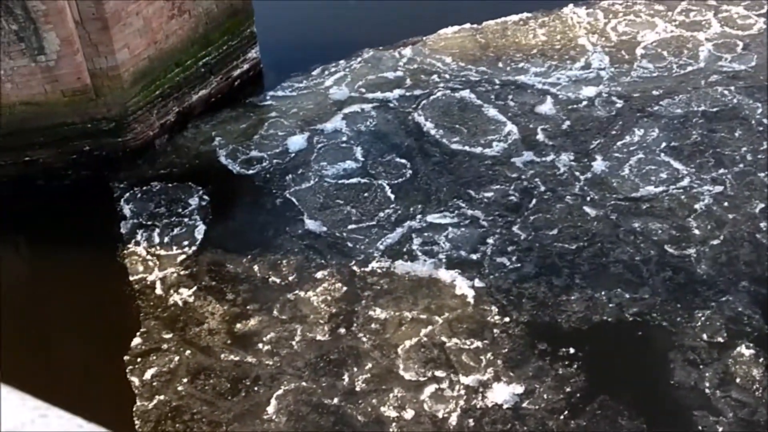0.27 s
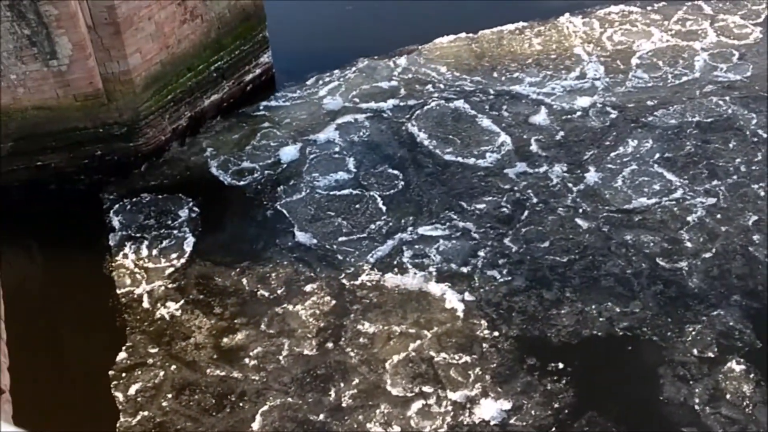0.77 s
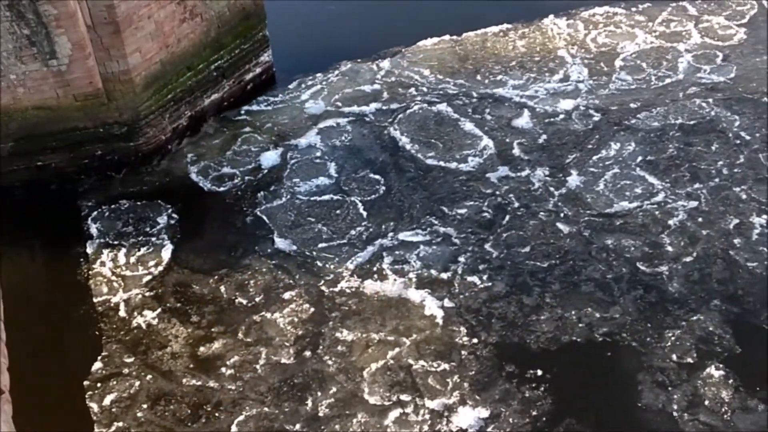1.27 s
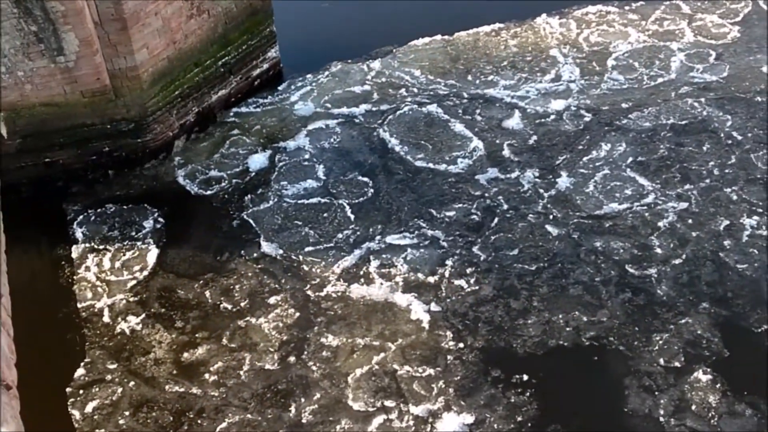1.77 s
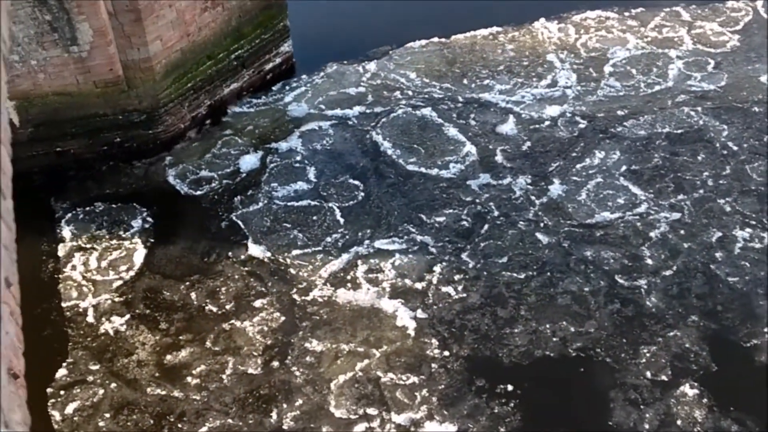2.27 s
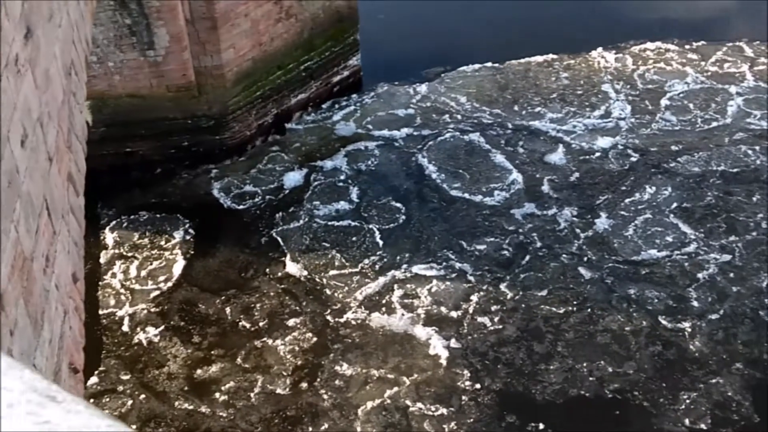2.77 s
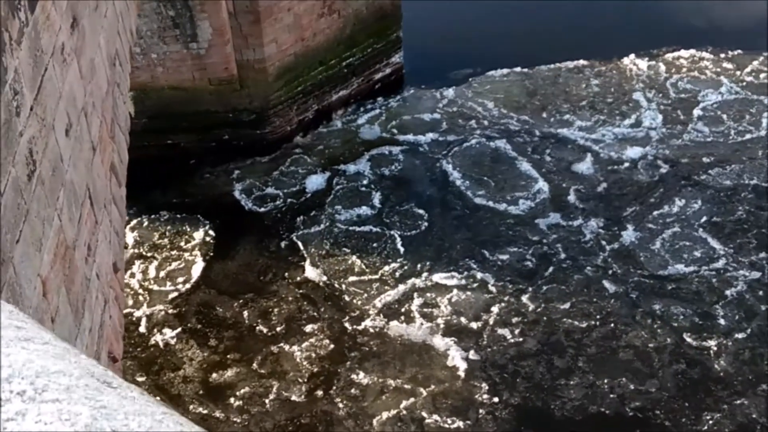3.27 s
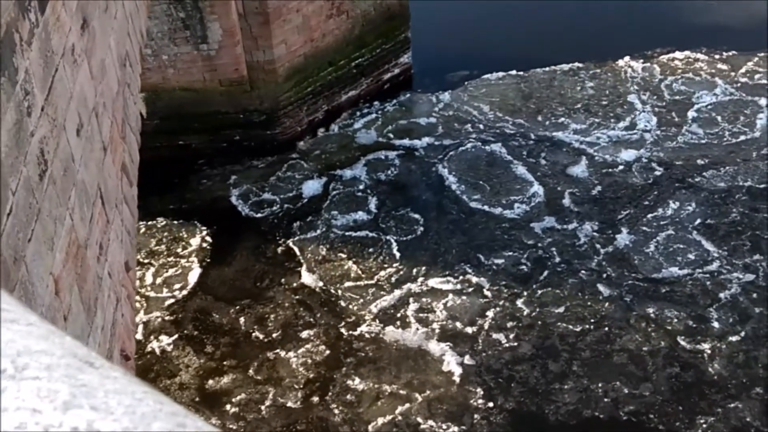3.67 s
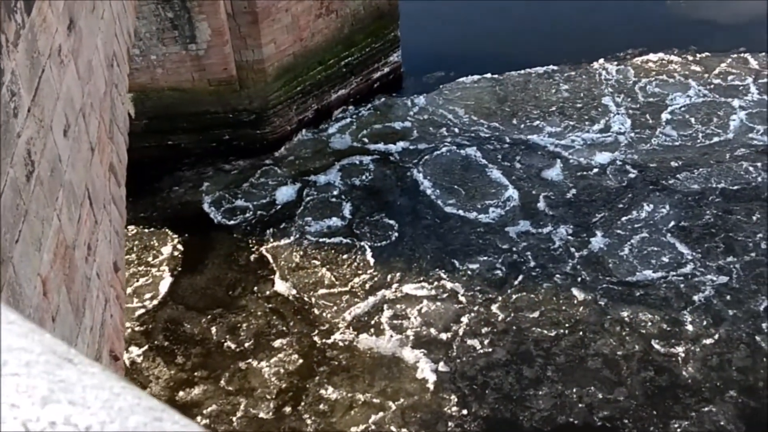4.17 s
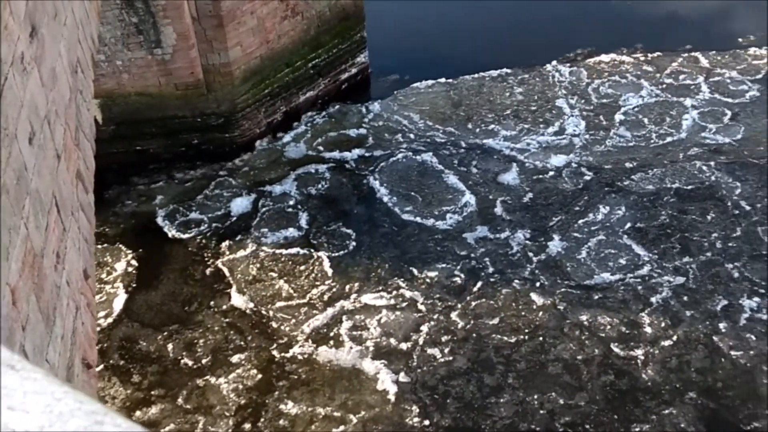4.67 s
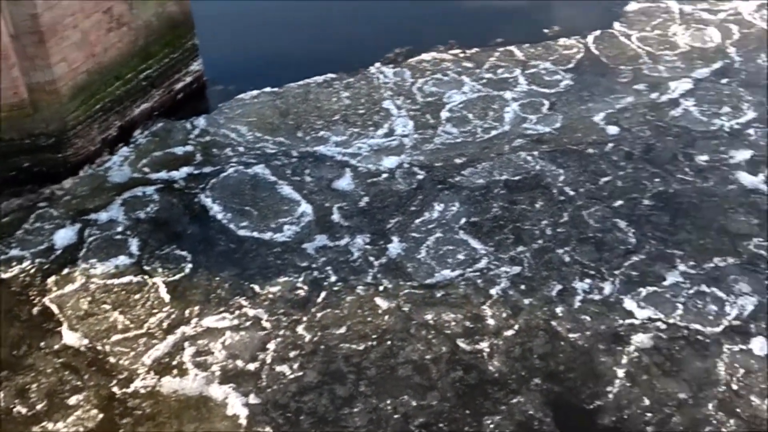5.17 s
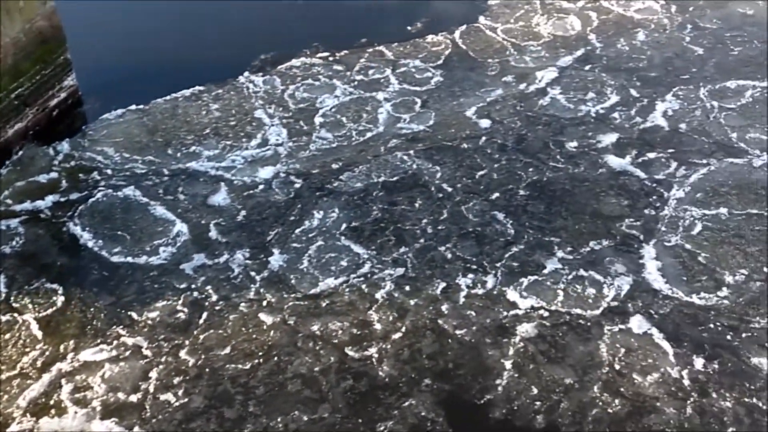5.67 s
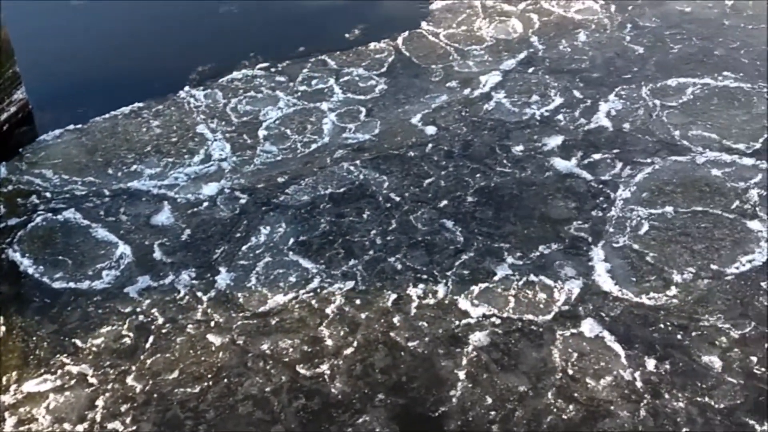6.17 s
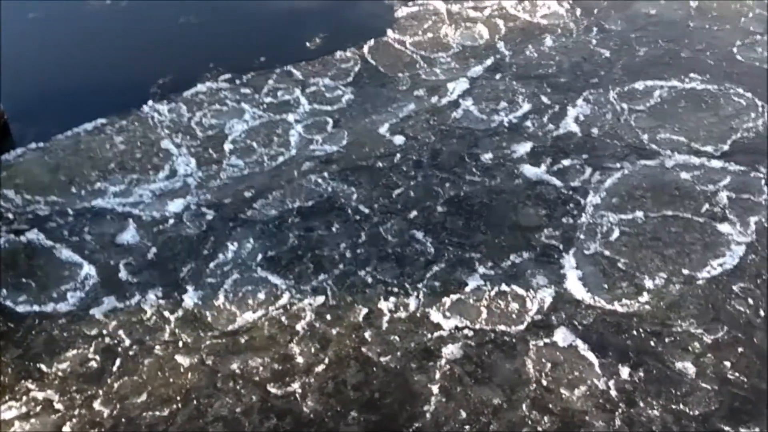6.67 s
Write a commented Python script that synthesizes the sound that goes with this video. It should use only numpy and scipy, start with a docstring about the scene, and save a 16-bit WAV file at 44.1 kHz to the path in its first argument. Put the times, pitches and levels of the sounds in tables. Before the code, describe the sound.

Heard from a bridge above a river, drifting ice floes rub and bump beside a brick pier. Low water churns and gulps. Hollow knocks come early, then a grainy slush rush swells around two seconds and ebbs. A busy run of knocks fills the middle; later it is quieter, with small clinks and a sharp clack near the end. Nearly centred stereo, slightly dulled top.

```python
"""Ice floes at a bridge pier

Ice floes drift down a river past a brick pier, heard from the bridge above.
Water is coloured noise and dull thuds; floes bump with short hollow knocks that sag in pitch.
Slushy rims rub with a rush of dense grains that swells once, and briefly sing in narrow bands.
Thin ice crunches and fizzes in finer grains, clinks in short resonances, and now and then
cracks in decaying clusters of snaps.
"""
import sys
import numpy as np
from scipy import signal
from scipy.fft import rfft, irfft, next_fast_len
from scipy.io import wavfile

SR = 44100
rng = np.random.default_rng(int(sys.argv[2]) if len(sys.argv) > 2 else 0)


def unload_wav(signal):
    """Save mono or channel-first audio to the path in sys.argv[1] as 16-bit WAV at rate SR, clipped to [-1, 1]."""
    wavfile.write(
        sys.argv[1],
        SR,
        np.round(np.clip(np.atleast_2d(signal).T, -1, 1) * 32767).astype(np.int16),
    )


N = 305613
TIME = np.arange(N) / SR


def from_db(db):
    """Decibels to gain."""
    return 10 ** (np.asarray(db) / 20)


def rms_one(x):
    """Scale to unit power."""
    return x / np.sqrt(np.mean(x ** 2) + 1e-20)


def white():
    """White noise of unit power."""
    return rng.standard_normal(N)


def gains(rows):
    """One interpolated gain curve per dB column of a table."""
    time_s, *columns_db = np.transpose(rows)
    return [from_db(np.interp(TIME, time_s, db)) for db in columns_db]


def swell(peak_s, half_s):
    """Smooth rise and fall around one moment."""
    return np.exp(-np.minimum(((TIME - peak_s) / half_s) ** 2, 50))


def drift(rate_hz):
    """Slow random wander with a spread of one, computed at every 40th sample."""
    pole = np.exp(-80 * np.pi * rate_hz / SR)
    slow = signal.lfilter([1], [1, -2 * pole, pole * pole], rng.standard_normal(N // 40 + 2002))
    slow = slow[2000:]  # skip the filter's start-up
    return np.interp(np.arange(N) / 40, np.arange(len(slow)), rms_one(slow))


def surge(rate_hz, depth_db):
    """Stick and slip make the level stumble; unit power."""
    return rms_one(from_db(depth_db * drift(rate_hz)))


def colour(x, spectrum):
    """Give a white signal a spectrum, keeping its power."""
    size = next_fast_len(N + SR // 10)
    hz, db = np.transpose(spectrum)
    bins_hz = np.maximum(np.fft.rfftfreq(size, 1 / SR), 1)
    gain = from_db(np.interp(np.log(bins_hz), np.log(hz), db))
    gain *= np.minimum(1, bins_hz / hz[0]) ** 2 * np.minimum(1, hz[-1] / bins_hz) ** 4
    return irfft(rfft(x, size) * rms_one(gain), size)[..., :N]


def grains(per_s, spread_db, smooth):
    """Random tiny contacts of uneven size over a smooth share of countless far ones; unit power."""
    size_db = spread_db * np.minimum(rng.exponential(1, N), 4)
    sizes = from_db(size_db) * rng.choice([-1, 1], N)
    clicks = sizes * (rng.random(N) < per_s / SR)
    return rms_one(rms_one(clicks) + smooth * white())


def widen(mid, side_db):
    """Diffuse sound reaches the two microphones differently: noise of opposite sign is added."""
    return mid + from_db(side_db) * white() * np.array([[1], [-1]])


def waver(x, edges_hz, rate_hz, depth_db):
    """Overlapping bands swell and fade, each on its own."""
    size = next_fast_len(N)
    spectrum, hz = rfft(x, size), np.fft.rfftfreq(size, 1 / SR)
    out = 0
    for share in np.eye(len(edges_hz)):
        band = irfft(spectrum * np.interp(hz, edges_hz, share), size)[..., :N]
        out = out + band * surge(rate_hz, depth_db)
    return out


def bursts(rows, decay_s):
    """Envelope that jumps at each event and dies away exponentially."""
    jumps = np.zeros(N)
    for time_s, db in rows:
        jumps[int(time_s * SR)] += from_db(db)
    return signal.lfilter([1], [1, -np.exp(-1 / (decay_s * SR))], jumps + 1e-18)


def bandpass(x, low_hz, high_hz):
    """Second-order resonance between two edges."""
    return signal.sosfilt(signal.butter(2, [low_hz, high_hz], "band", fs=SR, output="sos"), x)


# water gulps under a rocking floe: (time [s], relative level [dB])
GULPS = [(.02, -38), (.2, -31.5), (.37, -29), (.45, -30.5), (.71, -37), (.98, -33), (1.12, -34),
         (1.25, -31), (2.49, -32), (2.73, -33), (2.83, -37), (3.9, -34.5), (4.71, -30), (5.09, -34.5),
         (5.2, -38), (5.6, -38), (5.81, -31), (6.12, -33), (6.27, -36), (6.38, -35), (6.51, -34.5)]
GULP_HALF_S = 0.03


def gulping():
    """Gulp envelope: overlapping swells add in power."""
    return sum(from_db(db) ** 2 * swell(s, GULP_HALF_S) for s, db in GULPS) ** .5


def jostling():
    """Envelope of the stir around each bump in KNOCKS; swells add in power."""
    return sum(from_db(db) ** 2 * swell(s, half_s) for s, db, _, half_s in KNOCKS) ** .5


# current: (time [s], relative deep rumble level [dB], relative churning level [dB])
CURRENT = [(0.01, -41, -27.5), (0.67, -42, -36), (1.05, -36, -30), (1.53, -49, -28.5), (1.97, -55, -29.5),
           (2.37, -46, -25), (2.61, -53, -27.5), (2.89, -42, -26.5), (3.13, -52.5, -34.5),
           (3.81, -44.5, -29), (5.07, -43.5, -33.5), (5.27, -43.5, -25), (5.49, -45, -42),
           (5.87, -47, -36.5), (6.41, -38, -28), (6.91, -42, -39)]
# spectra of rumble, thuds and gulp belly: (frequency [Hz], relative density [dB])
RUMBLE_COLOUR = [(20, -30), (40, -25), (60, -17), (85, -3.5), (115, 0.5), (160, -1), (260, -2)]
CHURN_COLOUR = [(80, -24.5), (130, -11.5), (200, -2), (310, 3), (420, 1.5), (550, -9), (700, -14),
                (1000, -77)]
GULP_COLOUR = [(90, -11), (140, 1), (230, -4), (330, -1), (500, -24)]
# relative to the gulp or bump envelope
GULP_BELLY_DB, GULP_CHURN_DB = -4.5, -0.5
JOSTLE_CHURN_DB, JOSTLE_RUMBLE_DB = -15.5, -35.5


def river():
    """Water rumbles and churns in many small dull thuds; gulps and jostling floes stir up both."""
    gulp, jostle = gulping(), jostling()
    undertow, flow = gains(CURRENT)
    undertow = undertow * from_db(4.5) * surge(rate_hz=12, depth_db=-1.0)
    flow = flow * from_db(0.5) * surge(rate_hz=7.4, depth_db=1.5)
    # independent stirrings add in power
    rumble_gain = np.linalg.norm([undertow, gulp, jostle * from_db(JOSTLE_RUMBLE_DB)], axis=0)
    churn_gain = np.linalg.norm(
        [flow, gulp * from_db(GULP_CHURN_DB), jostle * from_db(JOSTLE_CHURN_DB)], axis=0)
    rumble = colour(widen(white(), side_db=-11.5), RUMBLE_COLOUR)
    belly = colour(white(), GULP_COLOUR) * from_db(GULP_BELLY_DB)
    thuds = colour(grains(per_s=250, spread_db=1.6, smooth=0.64), CHURN_COLOUR)
    thuds = waver(thuds, np.geomspace(140, 650, num=6), rate_hz=10.4, depth_db=3.5)
    return rumble * rumble_gain + belly * gulp + thuds * churn_gain


# floes shove: (time of release [s], gain [dB])
SHOVES = [(.165, 2.5), (.87, 6.5), (1.24, 4.5), (2.48, 3.5), (3.015, 5), (5.285, 1.5), (6.5, 2.5)]
SHOVE_BUILD_S, SHOVE_RELEASE_S = 0.065, 0.0081  # time constants


def shoving_db():
    """Shoves as gain in dB: pressure builds slowly in the slush, then lets go quickly."""
    total_db = 0
    for release_s, db in SHOVES:
        constant_s = np.where(TIME < release_s, SHOVE_BUILD_S, SHOVE_RELEASE_S)
        total_db = total_db + db * np.exp(-np.abs(TIME - release_s) / constant_s)
    return total_db


# rush turns hollow: (mid time [s], half length [s], frequency [Hz], width [Hz], mean depth [0-1])
HOLLOWS = [(0.376, 0.2, 1340, 266, 1), (0.594, 0.7, 816, 242, 0.74), (3.8, 0.88, 806, 127, 0.51),
           (5.48, 0.59, 926, 170, 0.4), (6.74, 0.043, 1290, 300, 0.3)]
HOLLOW_WOBBLE = 0.19  # spread of the depth, as a share of it


def hollow(x):
    """Soft notches open, waver and close again; each is applied twice."""
    for mid_s, half_s, hz, width_hz, depth in HOLLOWS:
        wobbly_depth = np.clip(depth * (1 + HOLLOW_WOBBLE * drift(5.6)), 0, 1)
        opening = wobbly_depth / (1 + ((TIME - mid_s) / half_s) ** 4) ** 2
        peak = signal.iirpeak(hz, hz / width_hz, fs=SR)
        for _ in range(2):
            x = x - opening * signal.lfilter(*peak, x)
    return x


# how hard the slush rims rub, as their rush: (time [s], relative level [dB])
RUSH_LEVEL = [(0.01, -33.5), (0.27, -22), (0.45, -27.5), (0.85, -27.5), (0.91, -27.5), (1.19, -23.5),
              (1.33, -24.5), (1.57, -18.5), (1.93, -17.5), (2.05, -15.0), (2.55, -19), (2.97, -18.5),
              (3.09, -22.5), (4.45, -25.0), (4.59, -28.5), (5.01, -23.5), (5.67, -22.5), (6.91, -27.5)]
# hollow body of the rush: (time [s], relative level [dB])
BODY_LEVEL = [(0.01, -37), (0.51, -31), (1.71, -21), (3.35, -32), (3.77, -28), (4.61, -33.5), (4.79, -62),
              (4.93, -47), (5.95, -56.5), (6.21, -59), (6.47, -65), (6.63, -40.5), (6.73, -61), (6.91, -61)]
# spectra of rush and body: (frequency [Hz], relative density [dB])
RUSH_COLOUR = [(700, -119), (860, -16.5), (1000, 3), (1130, 5.5), (1350, 1.5), (1650, -1), (2000, -8),
               (2300, -28), (2700, -27)]
BODY_COLOUR = [(180, -31.5), (330, -6), (520, 3), (700, 2.5), (900, 6), (1100, 2.5), (1500, -21),
               (2200, -26)]
RUSH_FOLLOWS = 0.77  # share of a shove's dB that reaches the rush


def rush():
    """Slush rims rub: dense grains over a noise body, wavering band by band."""
    (rush_gain,), (body_gain,) = gains(RUSH_LEVEL), gains(BODY_LEVEL)
    wash = colour(grains(per_s=3000, spread_db=4.0, smooth=1.97), RUSH_COLOUR)
    wash = wash * rush_gain * from_db(0.2)
    wash += colour(white(), BODY_COLOUR) * body_gain * from_db(4.5)
    wash = hollow(waver(wash, np.linspace(500, 2300, num=13), rate_hz=9, depth_db=1.9))
    return wash * from_db(RUSH_FOLLOWS * shoving_db())


# treble of the rubbing: (time [s], relative crunch level [dB], relative fizz level [dB])
TREBLE = [(0, -42.5, -51.5), (0.13, -39, -47.5), (0.55, -39, -54.0), (0.78, -38.5, -49.5),
          (1.33, -36, -52.5), (1.75, -28.5, -44), (2.1, -30, -47), (2.55, -40, -53.5), (3.1, -41.0, -55),
          (3.55, -40.5, -50), (3.8, -41.5, -52), (3.98, -38, -47), (4.5, -42, -53), (4.72, -40.5, -49),
          (5.3, -38.0, -50), (5.75, -40.5, -52), (6.5, -40.5, -51.5), (6.93, -44, -57)]
# spectra of crunch and fizz: (frequency [Hz], relative density [dB])
CRUNCH_COLOUR = [(1700, -10), (2300, 0.5), (2700, 0.5), (3300, 2), (3900, -1.5), (4500, -12.5), (5500, -24)]
FIZZ_COLOUR = [(3800, -3), (4800, 4.5), (5900, 4), (7000, -3), (8000, -2), (10200, -0.5), (12200, 2),
               (13200, -8), (14300, -14)]


def crystals():
    """Coarse crystals crunch and fine ones fizz; both stumble together and follow the shoves."""
    crunch_gain, fizz_gain = gains(TREBLE)
    slip = surge(rate_hz=15, depth_db=1.22) * from_db(shoving_db())
    crunch = colour(grains(per_s=1500, spread_db=0.5, smooth=2.8), CRUNCH_COLOUR)
    fizz = colour(widen(grains(per_s=2700, spread_db=4.0, smooth=1.4), side_db=-9.5), FIZZ_COLOUR)
    fizz = waver(fizz, np.linspace(5000, 13000, num=14), rate_hz=13.5, depth_db=2.1)
    return (crunch * crunch_gain * from_db(1.5) + fizz * fizz_gain * from_db(7.0)) * slip


# rubbed rim sings: (mid time [s], half length [s], frequency [Hz], level [dB])
SINGING = [(0.05, 0.057, 1040, -35), (0.305, 0.19, 1074, -32), (0.48, 0.021, 1060, -31)]
SINGING_WIDTH_HZ = 140


def singing():
    """Rubbing keeps one resonance of a rim ringing roughly: noise in a narrow band."""
    out = 0
    for mid_s, half_s, hz, db in SINGING:
        tone = bandpass(white(), hz - SINGING_WIDTH_HZ / 2, hz + SINGING_WIDTH_HZ / 2)
        out = out + from_db(db) * swell(mid_s, half_s) * rms_one(tone)
    return out


# floes bump: (time of peak [s], level [dB], pitch at peak [Hz], half length of the jostling [s])
KNOCKS = [(.0745, -10.5, 382, .01), (.187, -14, 279, .01), (.458, -15, 279, .01), (.501, -6.5, 335, .004),
          (.854, -9, 348, .01), (.879, -7, 332, .012), (1.039, -11, 379, .01), (1.077, -10.5, 263, .025),
          (1.236, -7.5, 335, .015), (1.265, -7, 280, .02), (2.495, -8.5, 302, .02),
          (2.733, -13.5, 304, .025), (3.023, -6, 450, .012), (3.388, -7.5, 418, .02),
          (3.422, -12, 341, .015), (3.506, -2.5, 580, .005), (3.667, -3.5, 405, .018),
          (3.696, -9, 433, .01), (3.745, -12, 382, .012), (3.844, -14, 410, .03), (3.94, -10, 381, .012),
          (3.953, -8.5, 418, .02), (3.971, -11.5, 391, .008), (4.097, -8, 377, .02),
          (4.113, -8.5, 338, .01), (4.316, -11.5, 390, .014), (4.373, -6, 383, .015),
          (4.386, -10.5, 381, .02), (6.234, -11.5, 380, .015), (6.518, -13, 196, .01),
          (6.572, -12, 278, .015), (6.608, -12, 381, .015), (6.895, -12, 358, .015)]
# a lone bump is dry, a jostled one rings longer
RING_CYCLES, RING_CYCLES_PER_S, RING_MOST_CYCLES = .25, 40, .65


def knocks(rise_share=.7, sag=.2):
    """Water cushions a bump: one push swells and dies within a few cycles, its pitch sagging."""
    out, t = np.zeros(N), np.arange(-SR // 50, SR // 50) / SR
    for peak_s, db, hz, half_s in KNOCKS:
        age = t * hz  # in cycles
        ring_cycles = min(RING_CYCLES + RING_CYCLES_PER_S * half_s, RING_MOST_CYCLES)
        swing = 1 / np.cosh(age / (ring_cycles * np.where(age < 0, rise_share, 1)))
        turns = age - sag * np.log(np.cosh(age))
        start = int((peak_s + t[0]) * SR)
        out[start:start + len(t)] += from_db(db) * swing * np.cos(2 * np.pi * turns)
    return signal.sosfilt(signal.butter(2, 110, "high", fs=SR, output="sos"), out)


# splinters snap: (time [s], relative level [dB])
SPLINTERS = [(.147, -28.5), (.2982, -27.5), (.855, -42), (1.0695, -34), (1.2126, -33), (1.7105, -28),
             (3.9714, -35), (4.0582, -29), (5.6042, -35), (5.8636, -29)]
# spectrum: (frequency [Hz], relative density [dB])
SPLINTER_COLOUR = [(2500, -27), (5500, 5), (8000, 2), (11000, 2), (14000, -6)]


def splinters():
    """Splinters tick brightly: short decaying bursts of chips."""
    chips = widen(grains(per_s=4000, spread_db=2.0, smooth=1.0), side_db=-9)
    return from_db(-2) * colour(chips * bursts(SPLINTERS, decay_s=0.0092), SPLINTER_COLOUR)


# small shards clink: (time [s], relative level [dB], pitch [Hz])
CLINKS = [(0.158, -17, 2500), (0.2505, -19, 3010), (4.227, -15, 2930), (4.608, -23, 2680),
          (4.6468, -20.5, 3600), (4.719, -17, 3130), (5.1214, -18, 3400), (5.2626, -16, 3160),
          (5.87, -19, 2940), (6.225, -11, 3430), (6.4338, -21, 3170), (6.664, -22, 3200),
          (6.8069, -16.5, 3360)]


def clinks(decay_s=0.0068, half_width_hz=300, trim_db=-6.0):
    """A shard rattles for a few milliseconds in one resonance."""
    out, t = np.zeros(N), TIME[:SR // 20]
    for time_s, db, hz in CLINKS:
        rattle = rng.standard_normal(len(t)) * np.exp(-t / decay_s)
        ring = bandpass(rattle, hz - half_width_hz, hz + half_width_hz)
        start = int(time_s * SR)
        out[start:start + len(t)] += from_db(db + trim_db) * ring / np.abs(ring).max()
    return out


# hard edges clack: (time [s], relative level [dB])
CLACKS = [(.852, -21), (6.2255, -11), (6.231, -13), (6.808, -19), (6.896, -23)]
# spectrum: (frequency [Hz], relative density [dB])
CLACK_COLOUR = [(200, -47), (500, 18), (900, 10), (1650, 20.5), (2300, -8), (3400, 6), (4400, -27),
                (7000, -26), (14000, -14)]


def clacks():
    """A clack is a quick cluster of snaps with a faint tail off the pier."""
    fracture = bursts(CLACKS, decay_s=0.0037)
    tail = from_db(-17) * bursts(CLACKS, decay_s=0.048)
    snaps = grains(per_s=2500, spread_db=1.5, smooth=.8)
    return from_db(-1.5) * colour(snaps * (fracture + tail), CLACK_COLOUR)


# spectrum: (frequency [Hz], relative density [dB])
SIZZLE_COLOUR = [(5000, -27), (7500, -4), (10000, -3), (12400, 4.5), (13500, -10), (15000, -20)]
SIZZLE_AT_S, SIZZLE_HALF_S, SIZZLE_DB = 5.42, 0.14, -37.5


def sizzle():
    """Wide high noise swells and fades once."""
    hiss = colour(widen(white(), side_db=-8), SIZZLE_COLOUR)
    return hiss * swell(SIZZLE_AT_S, SIZZLE_HALF_S) * from_db(SIZZLE_DB)


def scene():
    """Everything lies nearly straight ahead, a touch to the left."""
    water_and_rims = river() + rush() + crystals() + singing() + sizzle()
    impacts = knocks() + splinters() + clinks() + clacks()
    return (water_and_rims + impacts) * from_db([[.25], [-.25]])


# dips in the response: (frequency before detuning [Hz], nominal width [Hz], depth [0-1])
MIC_DIPS = [(2300, 140, 0.93), (4583, 990, 0.67), (6720, 1100, 0.48), (8910, 1000, 0.43),
            (11000, 570, 0.25), (13600, 700, 0.3)]


def microphone(x, detune_share):
    """Sound taking two paths into the port cancels in a row of dips."""
    for hz, width_hz, depth in MIC_DIPS:
        peak = signal.iirpeak(hz * (1 + detune_share), hz / width_hz, fs=SR)
        x = x - depth * signal.lfilter(*peak, x)
    return x


CUTOFF_HZ = 14350


def record(dry, mismatch_share=0.0049, bass_cut_hz=65, dull_hz=12500, dull_share=0.39):
    """Two unlike microphones: left has higher dips, less bass, a duller top; both lose the top."""
    left, right = microphone(dry[0], mismatch_share), microphone(dry[1], -mismatch_share)
    left = signal.lfilter(*signal.butter(1, bass_cut_hz, "high", fs=SR), left)
    left = left - dull_share * signal.lfilter(*signal.iirpeak(dull_hz, 4, fs=SR), left)
    top_cut = signal.ellip(12, .1, 80, CUTOFF_HZ, fs=SR, output="sos")
    return signal.sosfilt(top_cut, [left, right])


dry = scene()
out = record(dry)
unload_wav(out)
```